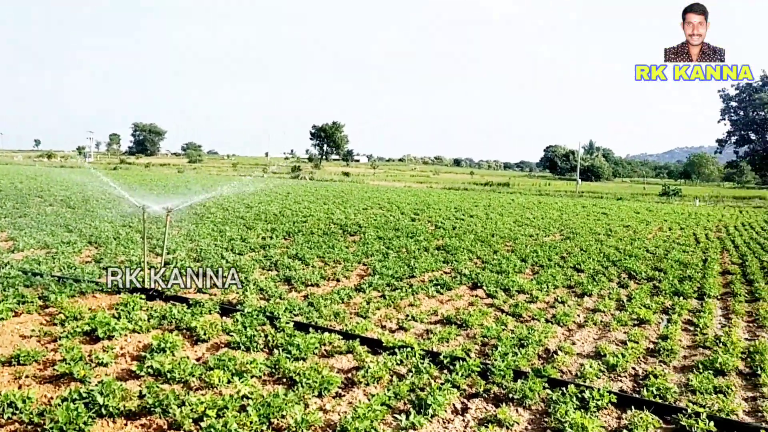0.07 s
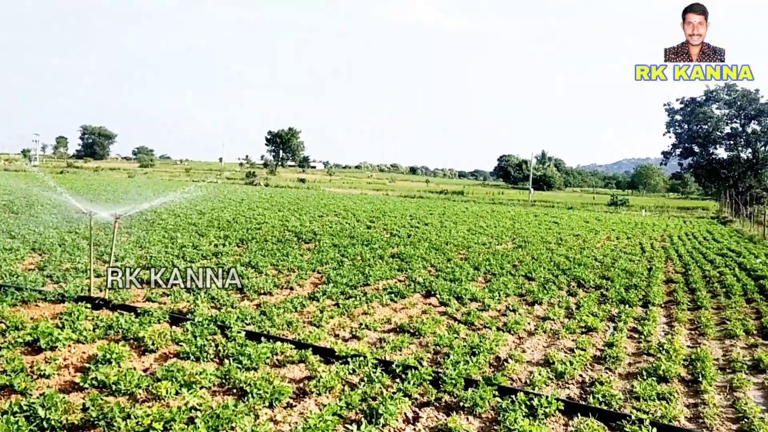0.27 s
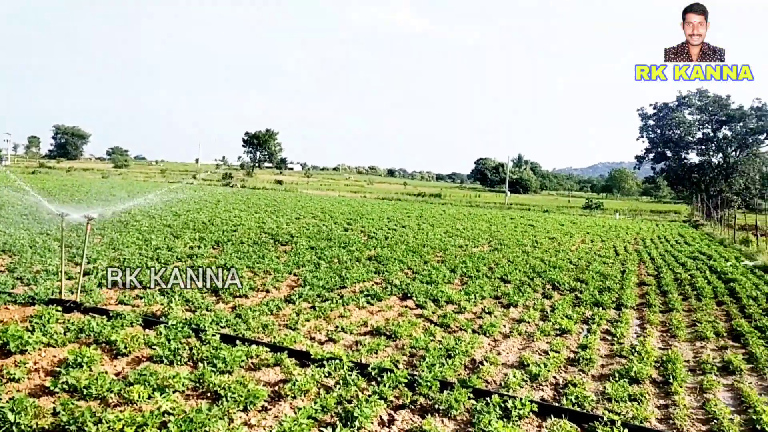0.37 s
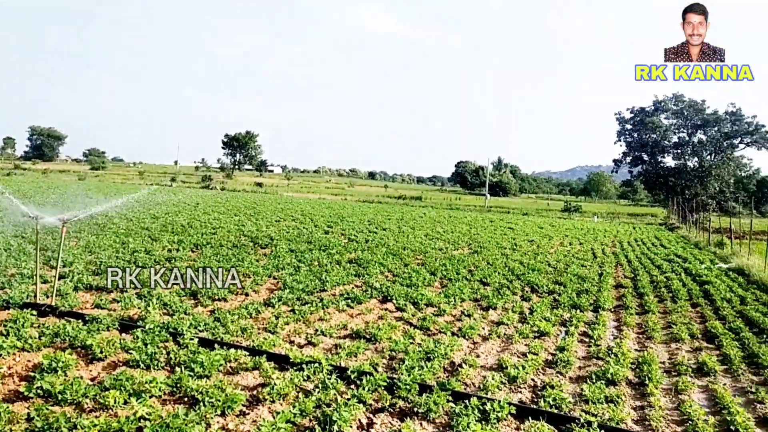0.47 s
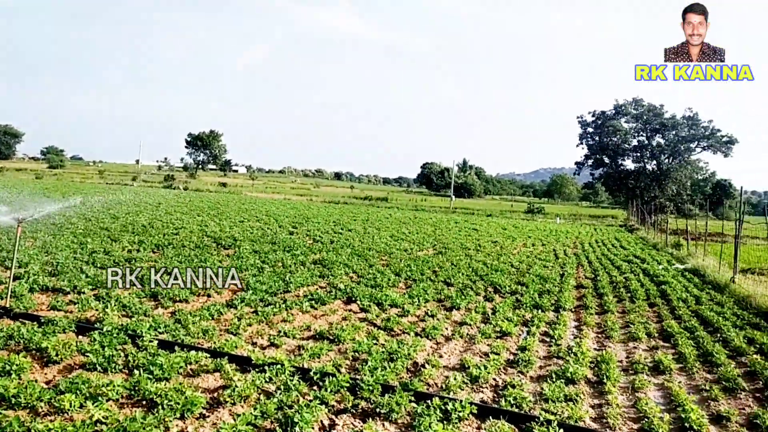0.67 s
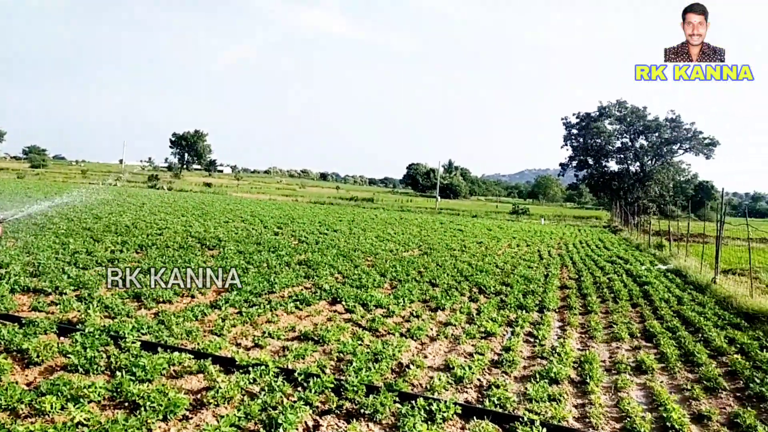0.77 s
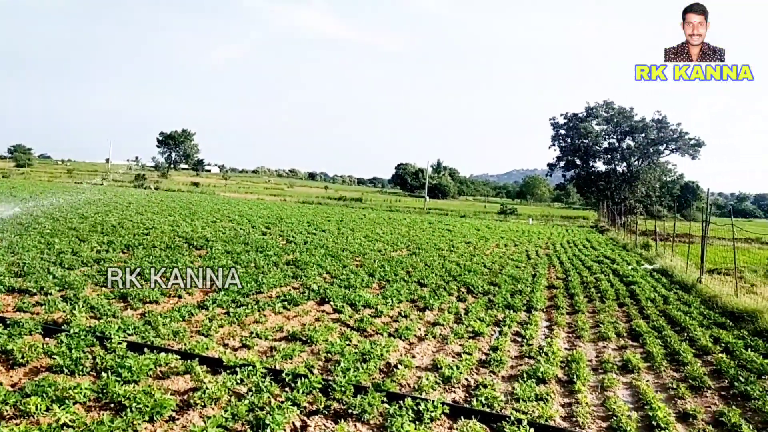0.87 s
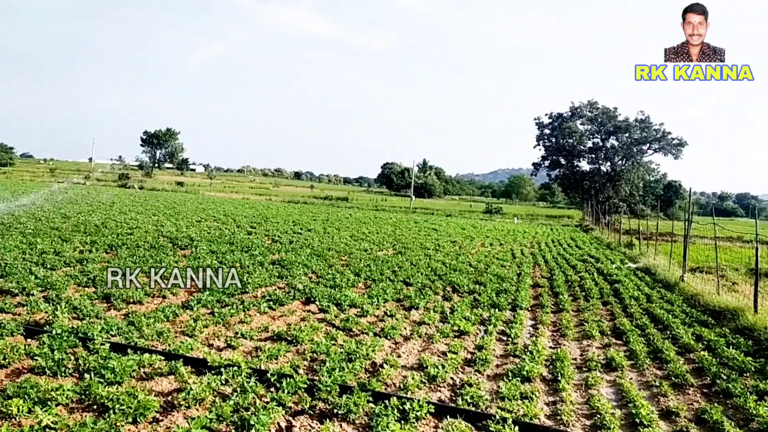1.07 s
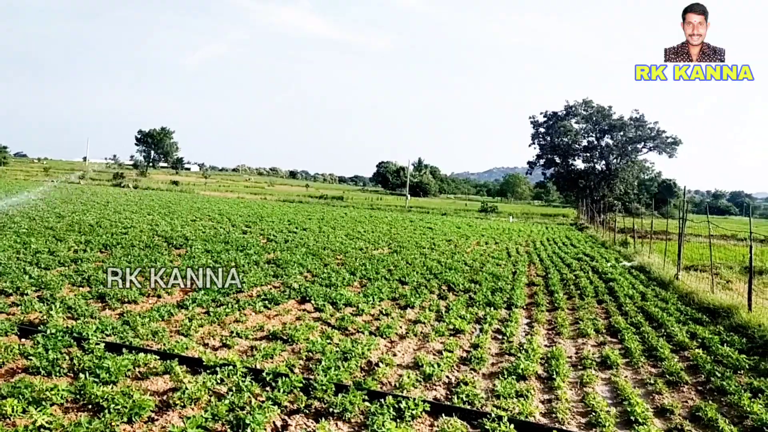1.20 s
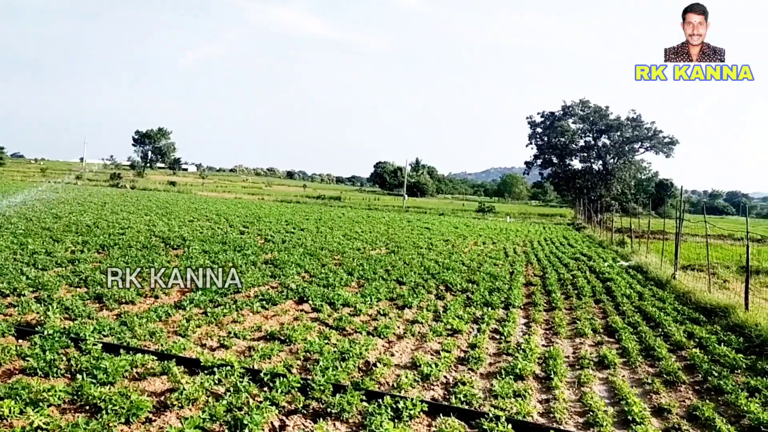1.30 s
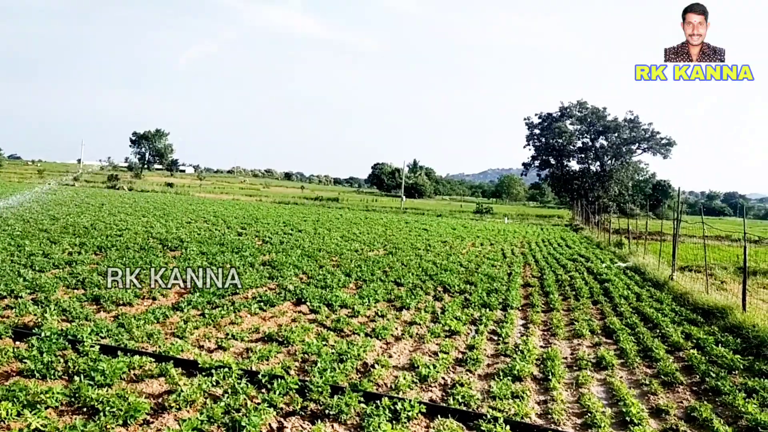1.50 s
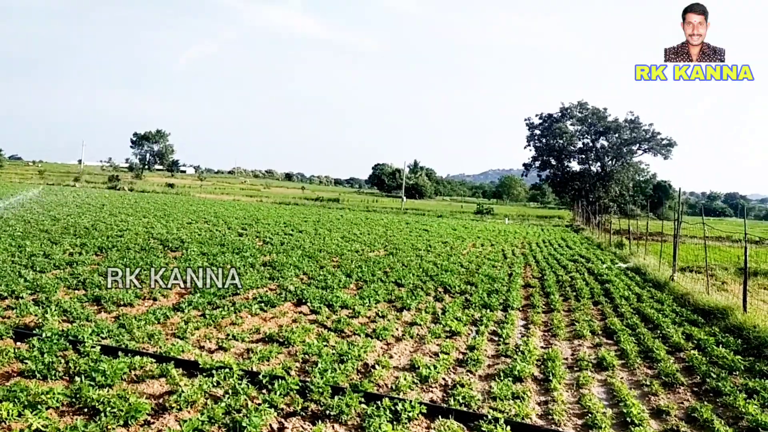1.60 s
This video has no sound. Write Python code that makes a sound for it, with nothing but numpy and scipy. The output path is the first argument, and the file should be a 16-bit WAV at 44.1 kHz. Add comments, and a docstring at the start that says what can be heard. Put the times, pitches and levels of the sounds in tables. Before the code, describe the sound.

An impact sprinkler spits short, hissing spurts of water over an open field. Wind rumbles on the right and dies down halfway, while close, dull knocks and soft rustles hit the microphone. A distant bird chirps faintly.

```python
"""From the start, an impact sprinkler's arm chops its jet into short spurts of spray over an open crop
field, while wind rumbles on the right microphone port. A small bird begins to chirp faintly, far off.
Near 0.2 s and 0.45 s, taps land beside the left port and push air into it: close, dull knocks, with soft
rustles mostly on the right. Halfway the wind dies down. Two lighter taps and rustles follow near 0.95 s
and 1.2 s, and the sprinkler spits on to the end."""
import sys
import numpy as np
from scipy import signal
from scipy.fft import rfft, irfft
from scipy.io import wavfile
from scipy.ndimage import uniform_filter1d

SR = 44100
rng = np.random.default_rng(int(sys.argv[2]) if len(sys.argv) > 2 else 0)


def dump_mix(stems):
    """Bounce the given channels to the path in sys.argv[1] as a 16-bit WAV at rate SR."""
    frames = np.atleast_2d(stems).T  # one column per channel
    limited = np.clip(frames, -1, 1)  # hard clip at full scale
    pcm = np.round(limited * 32767).astype(np.int16)
    wavfile.write(sys.argv[1], SR, pcm)


N = 72765
TIME = np.arange(N) / SR


def from_db(db):
    """Decibels to gain."""
    return 10 ** (np.asarray(db) / 20)


def noise(spectrum):
    """Noise of rms 1, coloured by a curve of (frequency [Hz], relative level [dB])."""
    hz, db = np.transpose(spectrum)
    bin_hz = np.arange(N // 2 + 1) * SR / N
    gain = from_db(np.interp(np.log(bin_hz + 1), np.log(hz), db))
    x = irfft(rfft(rng.standard_normal(N)) * gain, N)
    return x / x.std()


def flicker(rate):
    """A random wobble of spread about 1 that heads for a new value rate times a second."""
    return np.interp(TIME * rate, np.arange(N), rng.standard_normal(N))


def cut(x, hz, kind):
    """Second-order low- or high-pass."""
    return signal.sosfilt(signal.butter(2, hz, kind, fs=SR, output="sos"), x + 1e-18)


def band(x, hz, q):
    """A resonance with unity gain at its peak."""
    return signal.lfilter(*signal.iirpeak(hz, q, SR), x)


def burst(start, length, release_s, attack_s=0.005):
    """Envelope with a quick attack, a hold and an exponential release."""
    attack = np.clip((TIME - start) / attack_s, 0, 1)
    return attack * np.exp(-np.maximum(TIME - start - length, 0) / release_s)


def patchy(x, depth_db=4.5):
    """Each narrow band of a hiss swells and fades on its own, so the colour flickers."""
    _, _, bands = signal.stft(x, SR, nperseg=512)
    swell = uniform_filter1d(rng.standard_normal(bands.shape), size=3, axis=-1)   # smooth in time
    swell = uniform_filter1d(swell, size=3, axis=-2)   # and across bands
    mottled = signal.istft(bands * from_db(depth_db * swell / swell.std()), SR)[1][..., :N]
    return mottled * x.std() / mottled.std()


# Colour of the field's ambience: (frequency [Hz], relative level [dB])
FIELD_COLOUR = [(30, -3), (85, 13), (200, -3), (380, 1), (560, -9), (830, 9), (1150, -10.5), (1700, -8.5),
                (2300, 4.5), (3200, -19.5), (6500, -6.5), (8000, -8.5), (16000, -10.5)]


def field(level_db=-65, right_db=-0.5):
    """The open land lays a faint, wide wash under everything."""
    wash = np.array([noise(FIELD_COLOUR), from_db(right_db) * noise(FIELD_COLOUR)])
    return from_db(level_db) * patchy(wash)


# Distant bird calls: (time [s], level [dB])
BIRD_CALLS = [(.138, -60), (0.48, -58), (0.807, -57.5), (1.143, -56), (1.468, -65.5)]


def bird(fall_hz=(4580, 4470), rise_hz=(3770, 4360), note_s=0.022, spacing_s=0.03):
    """Each call is two thin, gliding whistles: one falls, the next rises."""
    out = np.zeros(N)
    for onset, db in BIRD_CALLS:
        for start, (from_hz, to_hz) in ((onset, fall_hz), (onset + spacing_s, rise_hz)):
            progress = np.clip((TIME - start) / note_s, 0, 1)
            hz = from_hz + (to_hz - from_hz) * progress + 40 * flicker(rate=360)
            whistle = np.sin(2 * np.pi * np.cumsum(hz) / SR)
            out += from_db(db) * np.sin(np.pi * progress) * whistle
    return out


# Rustle cues: (time [s], length [s], level [dB])
RUSTLE_CUES = [(0.204, 0.1, -57.5), (0.417, 0.13, -55.5), (.68, 0.016, -77), (0.957, 0.096, -60),
               (1.218, 0.098, -57.5)]
# Broad, soft-topped colour of a rustle: (frequency [Hz], relative level [dB])
RUSTLE_COLOUR = [(200, -1), (600, -1.5), (1100, -5.5), (2000, -3.5), (3500, -3.5), (6000, -14),
                 (16000, -30.5)]


def rustles(left_db=-2.5, release_s=0.03):
    """Soft rustles come and go, leaning to the right."""
    envelope = sum(from_db(db) * burst(start, length, release_s) for start, length, db in RUSTLE_CUES)
    return envelope * np.array([from_db(left_db) * noise(RUSTLE_COLOUR), noise(RUSTLE_COLOUR)])


# Fader curve of the wind on the right port: (time [s], level [dB])
GUST_CURVE = [(0, -39), (.10, -42.5), (.21, -39), (.29, -39), (.34, -40.5), (.43, -42.5), (.52, -39.5),
              (.58, -49), (.66, -42.5), (.73, -40), (.81, -43.5), (.86, -63.5), (1.05, -53), (1.16, -64),
              (1.24, -57), (1.35, -65.5), (1.65, -62)]
# Bass-heavy colour of the turbulence: (frequency [Hz], relative level [dB])
WIND_COLOUR = [(25, -41), (50, -22.5), (85, 6), (150, 4.5), (230, -3.5), (330, -14.5), (480, -35.5),
               (900, -47), (3000, -67.5)]


def wind(left_db=-20):
    """Turbulence rumbles separately at each port, riding the gust, far weaker on the left."""
    gust = from_db(np.interp(TIME, *np.transpose(GUST_CURVE)))
    return gust * np.array([from_db(left_db) * noise(WIND_COLOUR), noise(WIND_COLOUR)])


# Contacts beside the left port, clustered into four taps:
# (time [s], level [dB], swing [ms], edge [ms], crackle relative to the contact [dB])
TAP_CONTACTS = [(0.2084, -18, 1.04, 0.2, -27), (0.2097, -27.5, 1.9, 0.37, -5.5),
                (0.2123, -11, 0.17, 0.046, -38), (.2135, -7, 2.2, 0.23, -27.5),
                (0.216, -12.5, 0.26, 0.25, -20), (.2196, -37, 0.12, 0.13, 2), (0.4403, -20, 1.2, 0.36, -30),
                (0.4414, -17.5, 1.4, 0.029, -1), (0.4453, -15, 0.37, 0.027, -11.5),
                (0.4459, 0, 1.46, 0.79, -33.5), (.4600, -31, 0.34, 0.087, -12),
                (0.4643, -23, 1.9, 0.39, -19), (0.9596, -33.5, 0.94, 0.44, -17),
                (0.9637, -35.5, 0.92, 0.091, -28), (1.2028, -20.5, 0.097, 0.06, -16),
                (1.2040, -15, 0.77, 0.14, -42), (1.2156, -25.5, 0.11, 0.042, -27),
                (1.2177, -29, 0.47, 0.33, -39), (1.2191, -21.5, 2.8, 2.7, -40)]
# Colour of the crackle around a contact: (frequency [Hz], relative level [dB])
CRACKLE_COLOUR = [(150, -12.5), (600, 9.5), (1000, 1.5), (2300, 6), (4200, -7.5), (7000, -23), (10000, -19),
                  (16000, -35)]
# Ring of the casing: (frequency [Hz], Q, gain relative to the direct knock [dB])
CASING_MODES = [(850, 10, -8.5), (1230, 5.5, 0.5), (2350, 26, -4.5)]


def taps(crackle_s=0.0014, port_hz=77, port_q=0.57, knock_bleed_db=-32, crackle_bleed_db=-12.5):
    """Each contact sucks, then pushes at the left port with a crackle, and the casing rings."""
    push, crackle_envelope = np.zeros(N), np.zeros(N)
    for time, db, swing_ms, edge_ms, crackle_db in TAP_CONTACTS:
        ms = (TIME - time) * 1000
        push += from_db(db) * np.tanh(ms / edge_ms) * np.exp(-(ms / swing_ms) ** 2)
        crackle_envelope += from_db(db + crackle_db) * np.exp(-np.abs(TIME - time) / crackle_s)
    # The port sheds the sub-bass, rolls off the lows and swings once after each push.
    pressure = cut(push + crackle_envelope * noise(CRACKLE_COLOUR), 61, "high")
    omega = 2 * np.pi * port_hz
    port = signal.bilinear([1, 0, 0], [1, omega / port_q, omega ** 2], SR)
    knock = signal.lfilter(*port, pressure)
    left = knock + sum(from_db(db) * band(knock, hz, q) for hz, q, db in CASING_MODES)
    # The casing bleeds mids to the right port; the crackle carries better than the knock.
    bleed = from_db(knock_bleed_db) * left
    bleed += from_db(crackle_bleed_db) * crackle_envelope * noise(CRACKLE_COLOUR)
    right = cut(cut(bleed, 359, "high"), 4030, "low")
    return np.array([left, right])


def spatter(drops_per_s=260, drop_db=-7, spread_db=2.6, decay_s=0.0002):
    """Gain curve for the spray: single drops lift it for an instant and tick."""
    sizes = from_db(drop_db + spread_db * np.minimum(rng.exponential(1, N), 3))
    hits = sizes * (rng.random(N) < drops_per_s / SR)
    return 1 + signal.lfilter([1], [1, -np.exp(-1 / (decay_s * SR))], hits)


# Colour of the spray at the left port: (frequency [Hz], relative level [dB])
SPRAY_COLOUR_LEFT = [(400, -29), (1400, -25), (3200, -12.5), (3900, -3), (5200, -1), (6700, 1),
                     (7800, -15.5), (11000, -13), (16000, -17.5)]
# Its darker colour at the right port: (frequency [Hz], relative level [dB])
SPRAY_COLOUR_RIGHT = [(400, -23), (1400, -20.5), (3200, -8), (3900, 3), (5000, -3), (5600, -23),
                      (8000, -21.5), (12000, -15), (16000, -21)]


def spray(right_db=-4.5):
    """Fine water hisses, with a different colour at each port."""
    return np.array([noise(SPRAY_COLOUR_LEFT), from_db(right_db) * noise(SPRAY_COLOUR_RIGHT)])


# Sprinkler spurts: (time [s], length [s], level [dB], extra trim on the right [dB], accent [Hz])
SPURT_CUES = [(-.005, 0.028, -52.5, 3.5, 5300), (0.048, 0.017, -53, -3, 5900),
              (0.217, 0.03, -57.5, 10.5, 4600), (0.293, 0.016, -54.5, -12, 6070),
              (.455, 0.04, -59.5, 12.5, 4840), (.495, 0.013, -68.5, 13, 3770),
              (0.538, 0.022, -56, -2, 6350), (0.681, .032, -51, 2, 5500), (0.735, 0.029, -49, 1, 4900),
              (.783, 0.031, -52, 0.5, 6160), (.908, 0.023, -50.5, -0.5, 4630),
              (1, 0.051, -52.5, -0.5, 5600), (1.134, 0.033, -50, -1, 4860),
              (1.276, 0.026, -50.5, 0.5, 5570), (1.356, 0.039, -50, 1, 4690),
              (1.527, 0.014, -51.5, -0.5, 6170), (1.554, 0.029, -50, 3.5, 4100),
              (1.596, 0.029, -50.5, 2.5, 4320)]


def sprinkler(mist_db=-62, accent_db=-6, accent_q=6.1, release_s=0.022):
    """The arm breaks the jet into grainy spurts, each with its own bright accent, over a steady mist."""
    water = from_db(mist_db) * spray()
    jets = [spray(), spray()]   # alternated, so neighbouring spurts get separate noise
    for k, (start, length, db, trim_db, accent_hz) in enumerate(SPURT_CUES):
        jet = jets[k % 2]
        accented = jet + from_db(accent_db) * band(jet, accent_hz, accent_q)
        stereo_gain = from_db([[db], [db + trim_db]])
        water += stereo_gain * burst(start, length, release_s) * accented
    return patchy(water) * spatter()


def scene():
    """The stereo mix of all sources at the two ports."""
    return taps() + sprinkler() + rustles() + wind() + field() + bird()


def record(dry, cutoff_hz=15900):
    """A steep low-pass takes off the topmost air."""
    return signal.sosfilt(signal.ellip(12, 0.1, 80, cutoff_hz, fs=SR, output="sos"), dry)


dry = scene()
out = record(dry)
dump_mix(out)
```